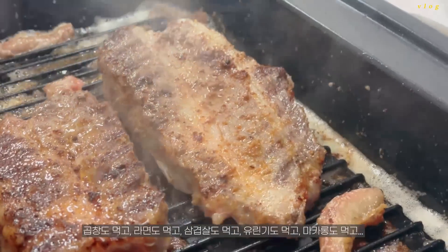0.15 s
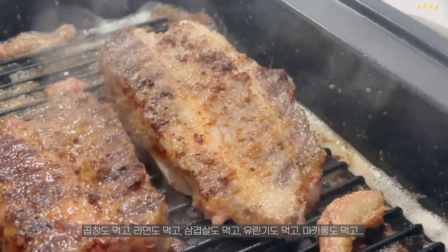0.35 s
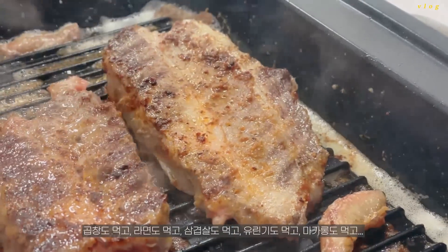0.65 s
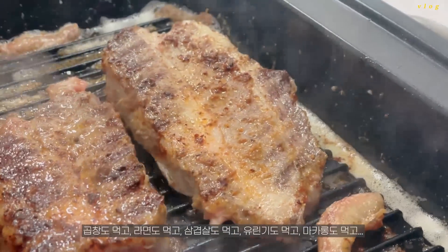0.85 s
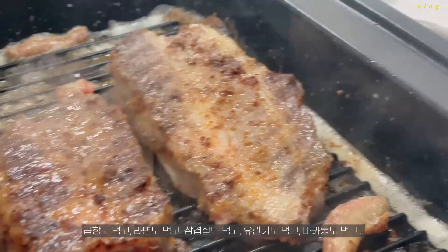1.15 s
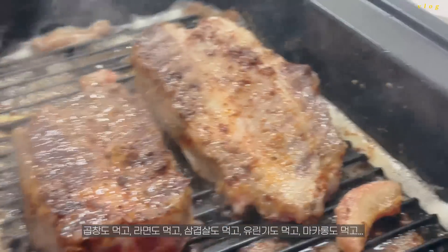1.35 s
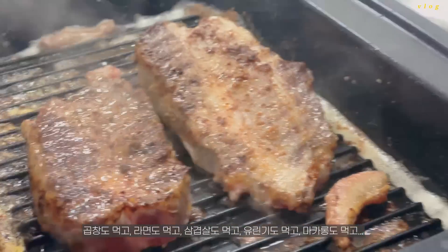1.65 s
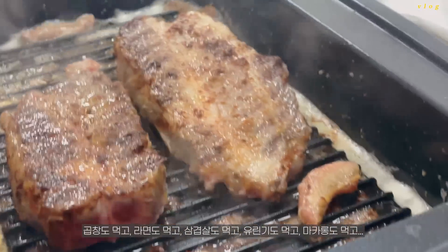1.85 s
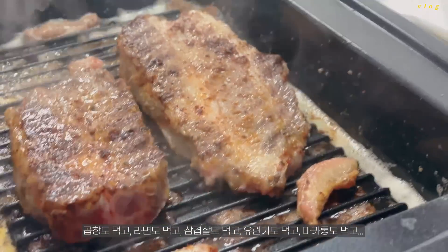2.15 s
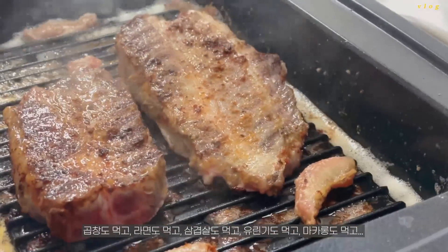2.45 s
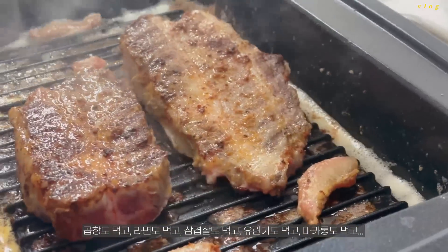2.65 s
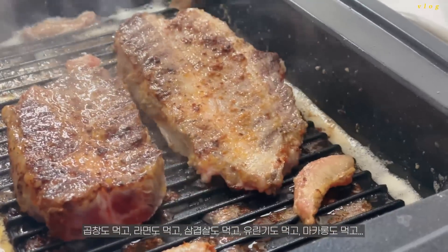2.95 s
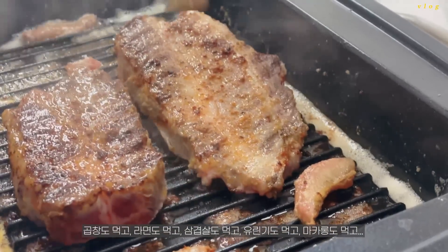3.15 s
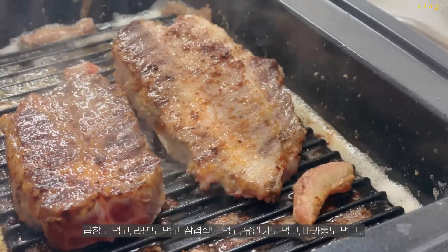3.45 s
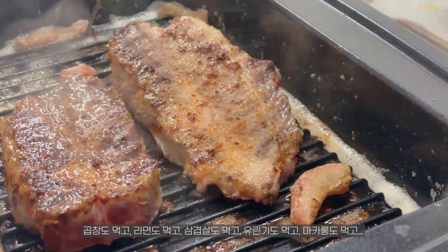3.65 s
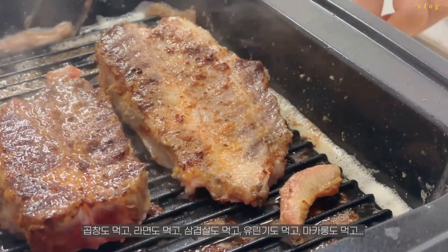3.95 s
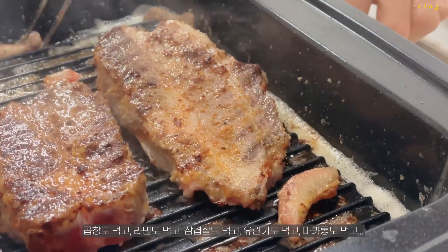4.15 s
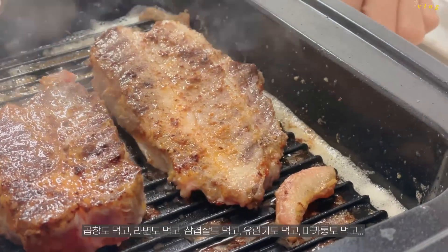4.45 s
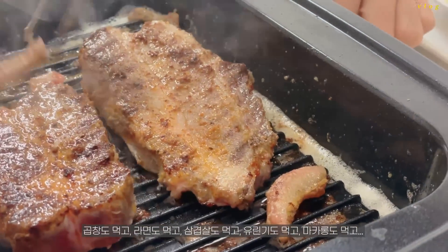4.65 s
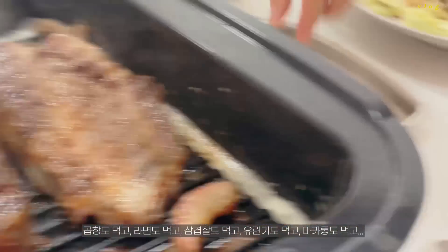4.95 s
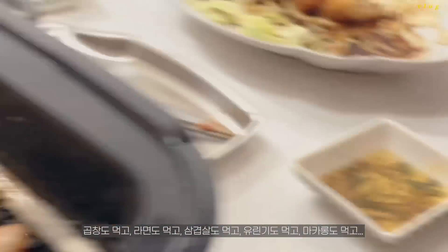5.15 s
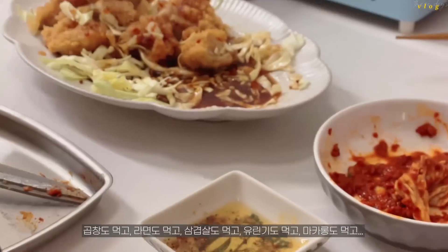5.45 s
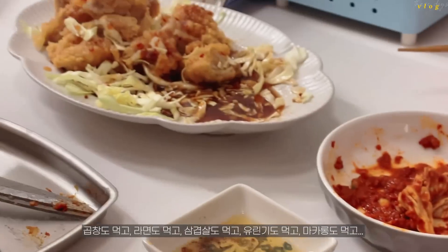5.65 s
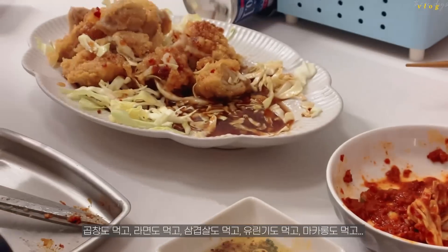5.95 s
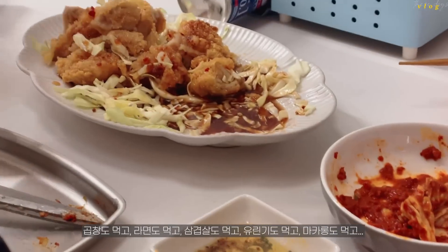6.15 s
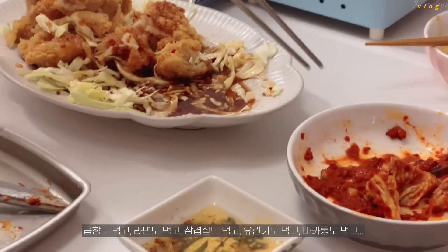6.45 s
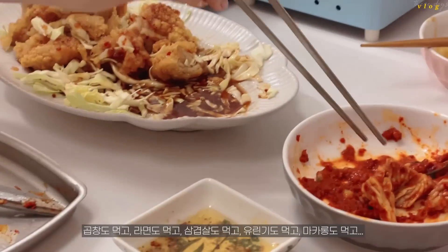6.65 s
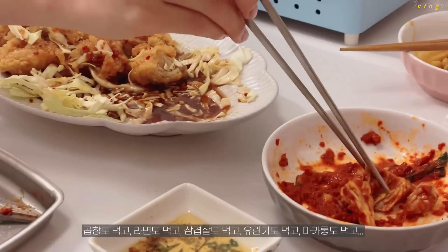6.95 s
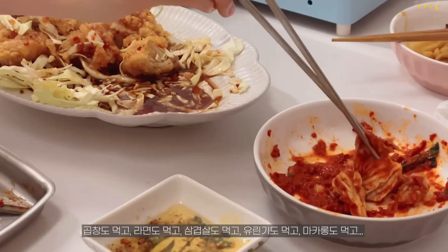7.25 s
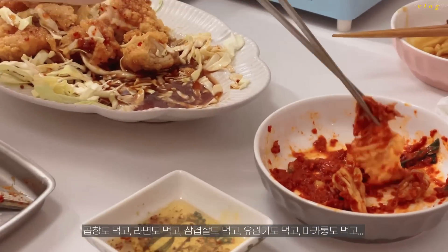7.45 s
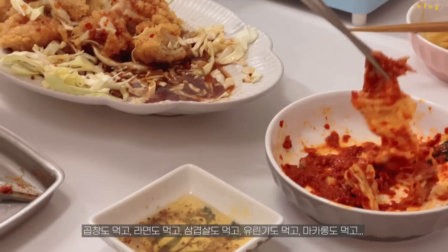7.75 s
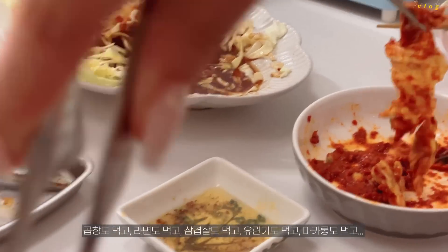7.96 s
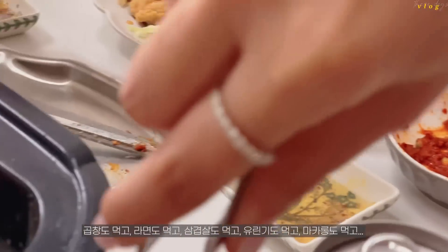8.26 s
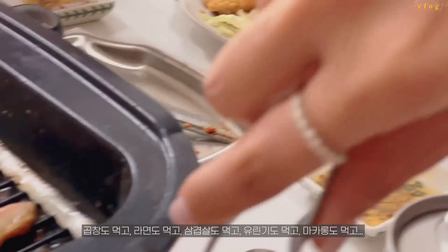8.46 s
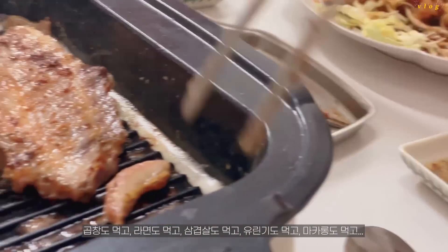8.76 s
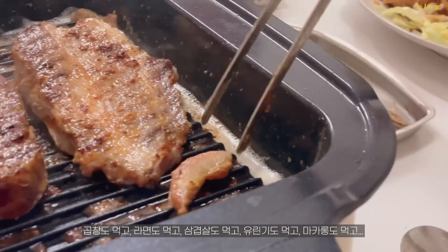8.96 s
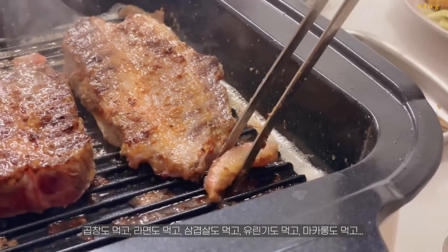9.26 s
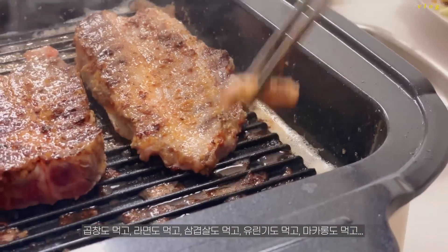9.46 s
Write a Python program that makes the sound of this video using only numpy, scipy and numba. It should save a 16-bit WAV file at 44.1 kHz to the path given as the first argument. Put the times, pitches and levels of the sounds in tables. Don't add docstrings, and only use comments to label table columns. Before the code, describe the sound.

Thick fatty meat sizzles without pause on an indoor tabletop grill, heard close on a handheld phone. Bright steam hiss and fine bubbling carry constant snaps and wet pops of fat. Around five seconds the phone swings toward the dishes and the extreme treble softens, with tight spits standing out; after eight seconds it swings back and brightens. A very faint fan hum and room rumble lie beneath.

```python
import sys
import numpy as np
from scipy import signal
from scipy.fft import rfft, irfft, next_fast_len
from scipy.io import wavfile
from scipy.ndimage import uniform_filter1d
from numba import njit

SR = 44100
rng = np.random.default_rng(int(sys.argv[2]) if len(sys.argv) > 2 else 0)


def nominal_scale(level):
    x = np.asarray(level, float) / 20
    return 10 ** x


def inscribe(sig):
    pcm = np.round(np.clip(np.atleast_2d(sig).T, -1, 1) * 32767)
    wavfile.write(sys.argv[1], SR, pcm.astype(np.int16))


N = 422919
FFT_N = next_fast_len(N)
HZ = np.maximum(np.arange(FFT_N // 2 + 1) * SR / FFT_N, 1)

# time_s, level_db
HEAT = [(0.0, -29), (0.91, -28), (1.17, -27), (1.76, -29), (2.59, -30.5), (3.26, -29.5), (3.42, -28.5),
        (3.63, -29), (4.41, -29), (4.73, -29), (5.82, -31.5), (7.08, -30.5), (7.29, -31), (8.76, -29.5),
        (9.59, -31)]
# time_s, turn_0_to_1
PHONE_TURN = [
    (0, 0),
    (4.85, 0),
    (5.3, 0.94),
    (8.2, 0.9),
    (8.8, 0.5),
    (9.59, 0.12),
]
# freq_hz, facing_db, turned_db
SIZZLE_COLOUR = [(250, -24, -17.5), (530, -17, -19), (903, -13.5, -17), (1630, -7, -7.5),
                 (1830, -10.5, -12), (2440, -5, -5), (3200, 2, -3), (4000, -4, -4), (5100, -3, -2.5),
                 (6860, -1.5, 0), (10230, 10, 6), (13230, 17, 6), (15300, 6, -1), (15600, 1, -14.5)]
# centre_s, half_length_s, swell_db
STEAM_JETS = [
    (0.76, .03, 2),
    (1.015, .04, 6),
    (1.3, .05, 2),
    (2.98, .03, 3),
    (4.75, .02, 3),
    (4.855, .025, 3),
    (8.06, .03, 3),
    (9.4, .04, 2),
]
# freq_hz, density_db_per_hz
RUMBLE = [(15, -31), (25, -6), (64, -0.5), (102, -2.5), (237, -5.5), (293, -8.5), (436, -14.5), (600, -6.5),
          (780, -15), (1320, -120)]
# freq_hz, waver_hz, level_db
FAN_HUM = [(51.3, 3.5, -57.5), (153.8, 2.2, -67), (239.3, .9, -68), (433, 2.5, -75), (610, 20, -68.5),
           (720, 20, -70)]
# start_s, peak_db, bubble_hz
LARGE_POPS = [(0.394, -5.5, 3340), (0.602, -6, 3270), (1.113, -16, 3020), (1.555, -11.5, 4200),
              (2.2072, -9.5, 3180), (2.8449, -13, 3700), (3.497, -7, 3500), (3.6173, -14, 3150),
              (3.733, -7, 3300), (3.8532, -13, 3320), (3.979, -10, 3250), (4.131, -10, 3430),
              (4.2552, -13, 3320), (4.6458, -8, 3360), (4.7093, -15, 3320), (5.1485, -10.5, 3100),
              (5.2025, -8.5, 3130), (5.7356, -9, 3600), (6.3909, -12, 3040), (6.6329, -13, 4220),
              (6.7687, -10, 3950), (7.1248, -10, 3540), (7.398, -10, 2100), (7.44, -9, 3400),
              (8.0606, -8, 3600), (8.9575, -12, 3260), (9.0858, -10, 3440), (9.2209, -5.5, 3500),
              (9.2714, -8.5, 3200), (9.3169, -7, 3470)]
# start_s, peak_db, bubble_hz
HIGH_SPITS = [(0.1346, -17, 4970), (0.3826, -13, 6800), (0.6409, -9, 5500), (1.28, -13, 5100),
              (1.354, -4, 6130), (2.7017, -9.5, 4660), (5.3789, -12, 5320), (5.4588, -3, 6760),
              (5.664, -3.5, 7150), (5.995, -12, 6970), (6.3426, 0, 6300), (6.4941, -5, 6400),
              (6.5141, -11, 6890), (6.7147, -14, 7400), (6.983, -12, 4500), (6.5646, -2.5, 4850),
              (6.9581, -10, 6400), (7.2635, -4, 5500), (8.04, -10, 6720), (8.3788, -16, 5180),
              (8.555, -4, 7190)]
# start_s, peak_db
MEDIUM_POPS = [(0.2816, -14), (0.3404, -14), (0.7901, -16), (0.838, -14), (1.198, -14), (1.44, -14),
               (1.8402, -13), (2.2645, -15), (2.6474, -13.5), (2.779, -15), (3.047, -16), (3.2266, -16),
               (3.2964, -15), (3.585, -13), (4.3717, -14), (4.4263, -15), (4.4558, -13.5), (4.5491, -15),
               (4.5662, -14), (4.6292, -14), (5.3178, -15), (5.9237, -12.5), (7.0469, -15), (7.193, -14),
               (7.555, -16), (7.7146, -14.5), (7.898, -17), (8.1641, -16), (8.8363, -15), (9.394, -18)]
# start_s, peak_db
LOUD_SNAPS = [(0.3826, -4), (0.7598, -1.5), (0.9998, -3), (1.022, 0), (1.3026, 0), (1.6453, -5),
              (2.266, 1), (2.549, -4), (2.9773, -5), (3.0003, -4), (3.0435, -3), (3.3534, -1),
              (3.5295, -3), (3.733, -3), (3.8302, 1), (3.9951, -3), (4.1322, -5), (4.294, -1),
              (4.7173, -2), (4.846, -4), (5.977, -6), (6.2099, -2), (6.5155, -3), (6.7699, -1.5),
              (6.984, -1), (8.0618, 1), (8.9588, -1), (9.234, 1), (9.3007, -1.5), (9.396, 0)]
# start_s, length_s, mean_db
SNAP_RUNS = [
    (0.95, 0.1, -7),
    (1.19, .2, -10),
    (3.15, .15, -12),
    (4.72, 0.16, -11),
    (5.419, .15, -8.5),
    (9.41, 0.045, -9),
]
# start_s, pitch_hz, level_db, t60_s
STEAM_WHISTLES = [(2.703, 4694, -15, 0.07), (2.5, 3270, -13, .03), (2.716, 3200, -22, .04),
                  (2.713, 5400, -28, 0.063), (3.497, 2300, -31, .06), (3.497, 3320, -14, 0.053),
                  (3.497, 4120, -16, 0.047), (3.625, 2024, -28, 0.097), (3.855, 2000, -25, 0.067),
                  (3.854, 3340, -22, 0.069), (3.854, 4710, -21, .05), (4.373, 2756, -19, .04),
                  (6.11, 6600, -28, .05), (8.412, 1410, -27, 0.053), (9.221, 3470, -15.5, 0.043),
                  (9.225, 1250, -28, 0.079), (9.222, 5555, -21, .04), (9.233, 4900, -19, 0.027),
                  (3.499, 7407, -21, .04)]
# start_s, peak_db, lowest_mode_hz
PAN_KNOCKS = [(0.462, -38, 759), (2.206, -37, 480), (2.232, -42, 428), (3.485, -38, 352), (3.624, -37, 820),
              (4.487, -35, 630), (4.644, -32, 900), (1.555, -36, 1100), (1.84, -37, 1100),
              (5.149, -27, 485), (6.343, -37, 610), (7.397, -40, 999), (9.221, -28, 455)]
# freq_ratio, level_db, t60_s
PAN_MODES = [(1.0, -1.2, .06), (1.2, -4.5, .04), (2.7, -11, .04), (4.4, -15, .035)]
# freq_hz, right_lead_rad
PORT_LEAD = [(100, -.1), (700, -.6), (1100, -.1), (1500, 0), (2400, 0), (3400, -.6), (4450, -.3),
             (5150, -.6), (5800, 1.5), (6600, .8), (7200, 1.2), (7550, 2.3), (8000, 2.3), (8300, 2.9),
             (8950, 3.35), (9400, 3.75), (11200, 4.75), (12800, 5.7), (13300, 6.283)]
# freq_hz, right_facing_db, right_turned_db, unrelated_share_0_to_1
PORT_LEVELS = [(100, -.9, -.9, .02), (450, -1.5, -3, .15), (860, -5.5, -7.5, .2), (1300, -1.2, -6, .06),
               (1650, 0, -1.5, 0), (1900, 0, 0, 0), (2400, 0, 0, 0), (3200, 0, 0, .02), (6000, 0, 0, .06),
               (8000, 0, 0, .05), (8500, 0, 0, .008), (12000, 0, 0, .07), (13300, 0, 0, 0)]

RUMBLE_DB, FIZZ_DB, SPIT_DB = -56, -1, -3.5
SPIT_PER_HEAT = 0.83
RISE_S = .0014
POP_T60_S, SPIT_T60_S, STRAY_T60_S = 0.026, .022, .035
POP_SNAP_DB = -10
STRAY_POP_HZ, STRAY_POP_DB, STRAY_SNAP_DB, STRAY_SPREAD_DB = 3600, -20, -12, 3.5
MEDIUM_FACING_HZ, MEDIUM_TURNED_HZ = 3300, 2900
SNAP_FACING_HZ, SNAP_TURNED_HZ = 12600, 10900


def level(x, db):
    return x * nominal_scale(db) / np.sqrt(np.mean(x ** 2))


def over_hz(table, index=1):
    table = np.array(table, float)
    return np.interp(np.log(HZ), np.log(table[:, 0]), table[:, index])


def over_time(table, index=1):
    table = np.array(table, float)
    return np.interp(np.arange(N) / SR, table[:, 0], table[:, index])


def shape(x, gain):
    return irfft(rfft(x, FFT_N) * gain, FFT_N)[:N]


def walk(rate_hz):
    k = int(SR / rate_hz)
    held = np.repeat(rng.standard_normal(N // k + 1), k)
    return 1.05 * uniform_filter1d(uniform_filter1d(held, k), k)[:N]


@njit
def rings(s, hz, t60, size, glide):
    out = np.zeros(N)
    for k in range(len(s)):
        i, z = int(s[k] * SR), size[k] + 0j
        p = np.exp(2j * np.pi * hz[k] / SR - np.log(1000) / (t60[k] * SR))
        turn = np.exp(2j * np.pi * hz[k] / SR * glide / (t60[k] * SR))
        for j in range(max(i, 0), min(i + int(t60[k] * SR) + 2, N)):
            out[j] += z.imag
            z, p = z * p, p * turn
    return out


def bubbles(rate_hz, lo_hz, hi_hz, scatter_db, cycles, clump_db):
    count = int(rate_hz * N / SR)
    chance = rng.random((count, 4)).T
    hz = lo_hz + (hi_hz - lo_hz) * chance[1]
    rarity = np.minimum(-np.log(1 - chance[2]), 4.5)
    size = nominal_scale(rarity * scatter_db) * np.sqrt(hz / hi_hz)
    t60 = cycles * (1 + 2 * chance[3]) / hz
    bursts = rings(chance[0] * N / SR, hz, t60, size, 0.21)
    return level(bursts * nominal_scale(clump_db * walk(50)), 0)


def sizzle(turn):
    steam = rng.standard_normal(N) * nominal_scale(1.7 * walk(60) + 0.95 * walk(20))
    tick_db = 4 * np.minimum(rng.exponential(size=N), 4.2) + 2.3 * walk(35)
    ticks = rng.standard_normal(N) * (rng.random(N) < .02) * nominal_scale(tick_db)
    bed = level(steam, -2) + level(ticks, -3.5)
    bed = bed + nominal_scale(-2) * bubbles(3000, 500, 8000, 3.4, 4, 1.9)
    bed = bed + nominal_scale(-3) * bubbles(3000, 8000, 15600, 3.1, 7, 2.1)

    heat_db = over_time(HEAT)
    mean_db = heat_db.mean()
    time_s = np.arange(N) / SR
    jets_db = sum(db * np.exp(-((time_s - s) / half) ** 2) for s, half, db in STEAM_JETS)
    fizz_db = heat_db + FIZZ_DB
    spit_db = mean_db + SPIT_PER_HEAT * (heat_db - mean_db) + SPIT_DB + jets_db
    high = 1 / (1 + (8000 / HZ) ** 6)
    out = 0
    for band, db in ((1 - high, fizz_db), (high, spit_db)):
        facing, turned = (level(shape(bed, band * nominal_scale(over_hz(SIZZLE_COLOUR, k))), 0) for k in (1, 2))
        out = out + nominal_scale(db) * ((1 - turn) * facing + turn * turned)
    return out


def room():
    out = level(shape(rng.standard_normal(N), nominal_scale(over_hz(RUMBLE))), RUMBLE_DB)
    for hz, waver_hz, db in FAN_HUM:
        swell = nominal_scale(2.8 * walk(7))
        phase = 2 * np.pi * np.cumsum(hz + waver_hz * walk(9)) / SR
        out = out + level(swell * np.sin(phase), db)
    return out


def strays(start_s, length_s, db, count):
    chance = rng.random((count, 3)).T
    s = start_s + length_s * (np.arange(count) + chance[0]) / count
    return s, db + STRAY_SPREAD_DB * (2 * chance[1] - 1), 2 * chance[2] - 1


def splash(s, hz, t60, db, count, cycles, spread, delay, child_db):
    chance = rng.random((len(s), count, 4)).transpose(2, 0, 1)
    late = -np.log(1 - chance[0]) * delay * t60[:, None]
    child_hz = np.clip(hz[:, None] * 2 ** (spread * (2 * chance[1] - 1)), 300, 15600)
    size = nominal_scale(db[:, None] + child_db - 60 * late / t60[:, None]) * (2 * chance[2] - 1)
    start = s[:, None] + late - .02 * t60[:, None]
    child_t60 = 8 * (1 + chance[3]) / child_hz
    drops = rings(start.ravel(), child_hz.ravel(), child_t60.ravel(), size.ravel(), 0.12)
    crack = rings(s, 1.7 * hz, 3 / hz, nominal_scale(db), 0.)
    return rings(s, hz, cycles / hz, nominal_scale(db), 0.11) + crack + drops


def pops(turn):
    big_s, big_db, big_hz = np.vstack([LARGE_POPS, HIGH_SPITS]).T
    medium_s, medium_db = np.transpose(MEDIUM_POPS)
    medium_turn = turn[(medium_s * SR).astype(int)]
    medium_hz = MEDIUM_FACING_HZ + (MEDIUM_TURNED_HZ - MEDIUM_FACING_HZ) * medium_turn
    stray_s, stray_db, size = strays(0, N / SR, STRAY_POP_DB, count=70)
    s, db = np.r_[big_s, medium_s, stray_s], np.r_[big_db, medium_db, stray_db]
    hz = np.r_[big_hz, medium_hz, STRAY_POP_HZ * 2 ** (.6 * size)]
    counts = [len(LARGE_POPS), len(HIGH_SPITS), len(medium_s) + len(stray_s)]
    t60 = np.repeat([POP_T60_S, SPIT_T60_S, STRAY_T60_S], counts)
    return splash(s + RISE_S, hz, t60, db, count=14, cycles=15.4, spread=0.7, delay=.09, child_db=-13)


def snaps(turn):
    big_s = np.vstack([LARGE_POPS, HIGH_SPITS])[:, 0]
    groups = [np.transpose(LOUD_SNAPS), np.array([big_s + RISE_S, np.full(len(big_s), POP_SNAP_DB)])]
    groups += [np.array(strays(*row, count=6)[:2]) for row in SNAP_RUNS]
    groups.append(np.array(strays(0, N / SR, STRAY_SNAP_DB, count=36)[:2]))
    s, db = np.hstack(groups)
    snap_turn = turn[np.clip(s * SR, 0, N - 1).astype(int)]
    hz = SNAP_FACING_HZ + (SNAP_TURNED_HZ - SNAP_FACING_HZ) * snap_turn
    hz = hz * (1 + .04 * rng.standard_normal(len(s)))
    t60 = np.full(len(s), .012)
    return splash(s, hz, t60, db + 4.5, count=8, cycles=7, spread=.45, delay=.07, child_db=-8)


def knocks():
    s, db, hz = np.transpose(PAN_KNOCKS)
    return sum(rings(s + RISE_S, hz * ratio, np.full(len(s), t60), nominal_scale(db + mode_db), 0.)
               for ratio, mode_db, t60 in PAN_MODES)


def whistles():
    s, hz, db, t60 = np.transpose(STEAM_WHISTLES)
    return rings(s, hz, .8 * t60, nominal_scale(db), 0.) * nominal_scale(3.5 * walk(500))


def crackle(turn):
    small = 1 / (1 + (1350 / HZ) ** 2.2) / (1 + (HZ / 15000) ** 12)
    bursts = pops(turn) + snaps(turn) + whistles()
    return shape(bursts, small) + shape(knocks(), 1 / (1 + (250 / HZ) ** 3))


def smear(near):
    tail = rng.standard_normal(4000) * nominal_scale(-60 * np.arange(4000) / SR / 0.052)
    return near + nominal_scale(-34) * signal.fftconvolve(near, tail)[:N]


def ports(sound, turn):
    other = level(sound * walk(120), 0) * np.std(sound)
    share = np.clip(over_hz(PORT_LEVELS, 3), 0, 1)
    phase = np.exp(.5j * over_hz(PORT_LEAD))
    direct, diffuse = np.sqrt(1 - share / 2), np.sqrt(share / 2)
    left = shape(sound, direct / phase) + shape(other, diffuse / phase)
    right = shape(sound, direct * phase) - shape(other, diffuse * phase)
    facing, turned = (shape(right, nominal_scale(over_hz(PORT_LEVELS, k))) for k in (1, 2))
    return np.array([left, (1 - turn) * facing + turn * turned])


def scene():
    turn = np.clip(over_time(PHONE_TURN), 0, 1)
    return ports(sizzle(turn) + smear(crackle(turn)) + room(), turn)


def low_pass(x):
    return signal.sosfilt(signal.butter(12, 16190, fs=SR, output="sos"), x)


def record(dry):
    band = 1 / (1 + (40 / HZ) ** 6) * (HZ < 15820)
    mix = np.array([shape(x, band) for x in np.tanh(dry)])
    return low_pass(mix)


dry = scene()
out = record(dry)
inscribe(out)
```